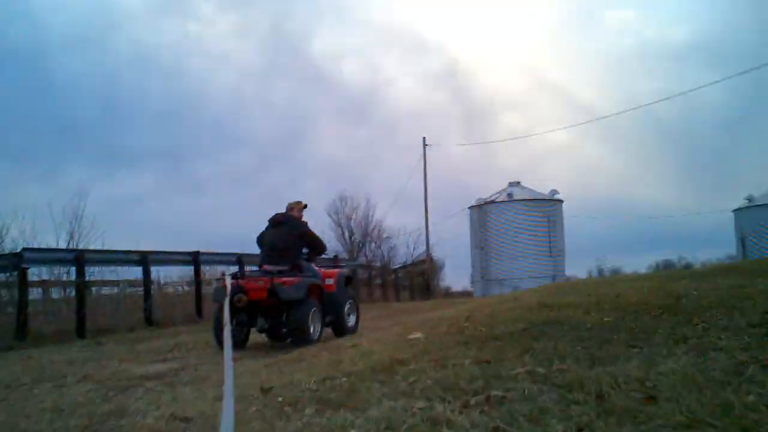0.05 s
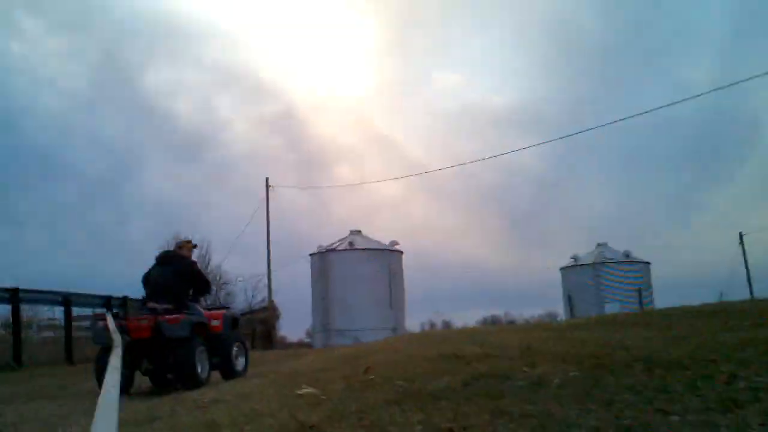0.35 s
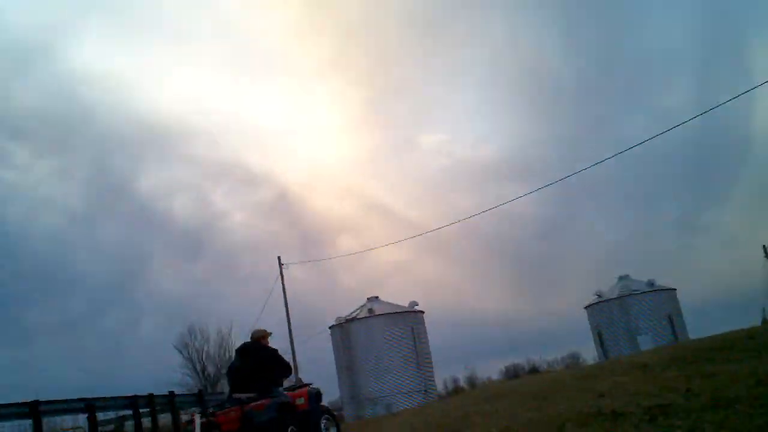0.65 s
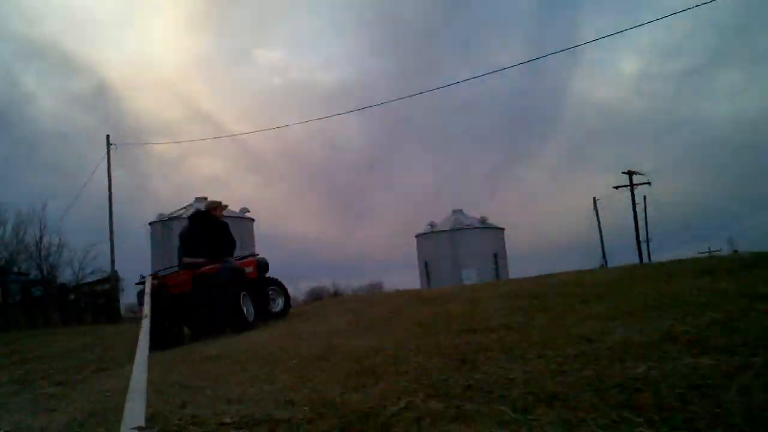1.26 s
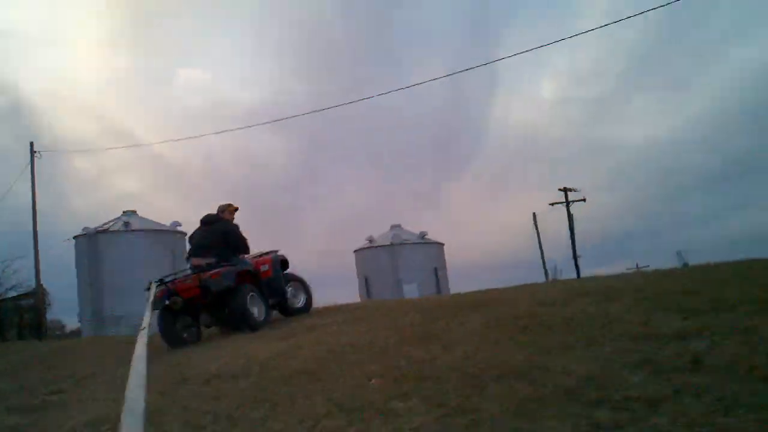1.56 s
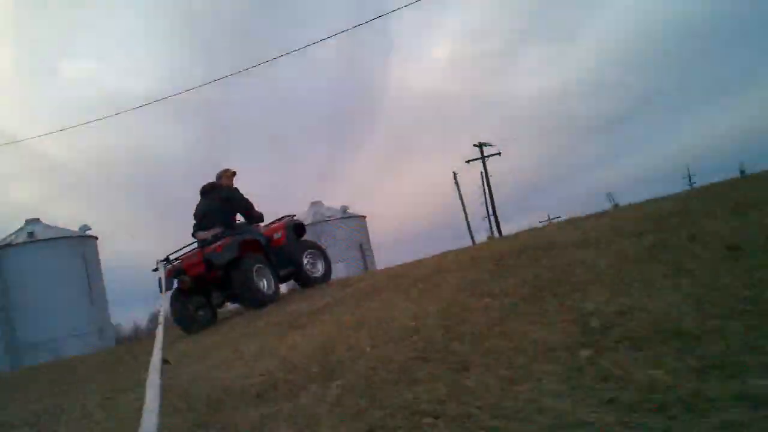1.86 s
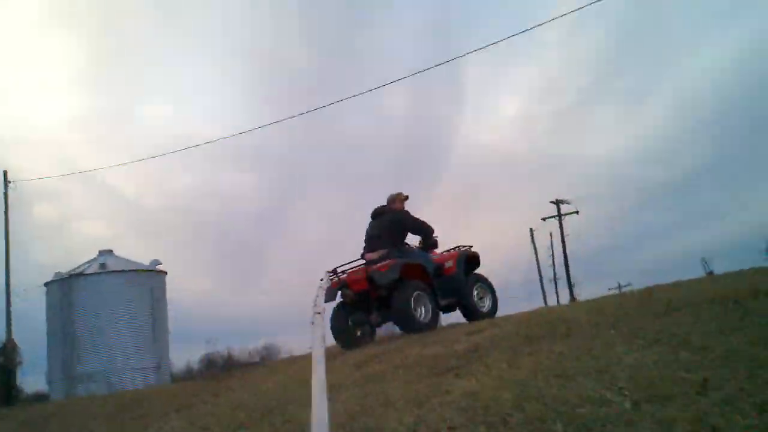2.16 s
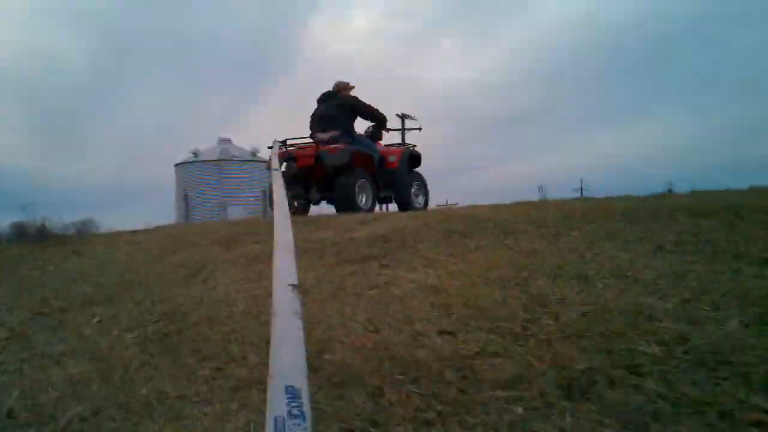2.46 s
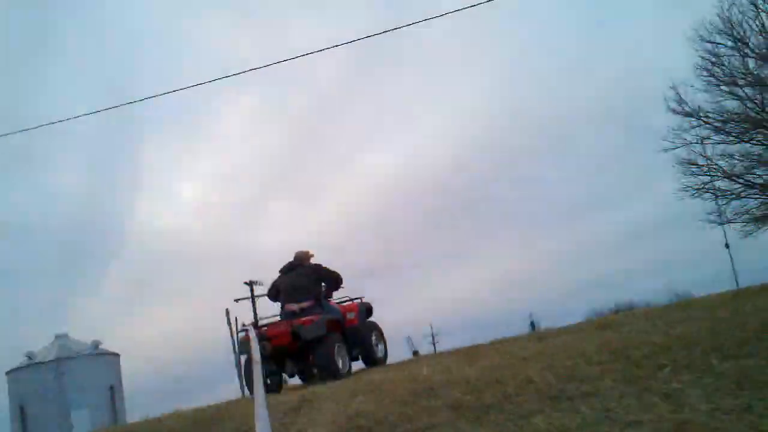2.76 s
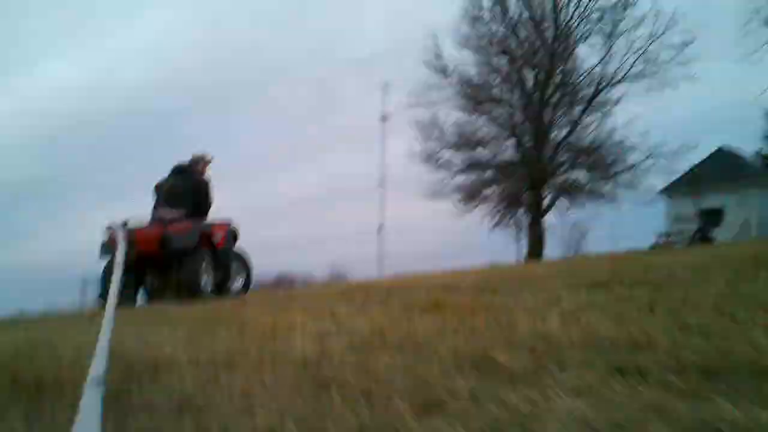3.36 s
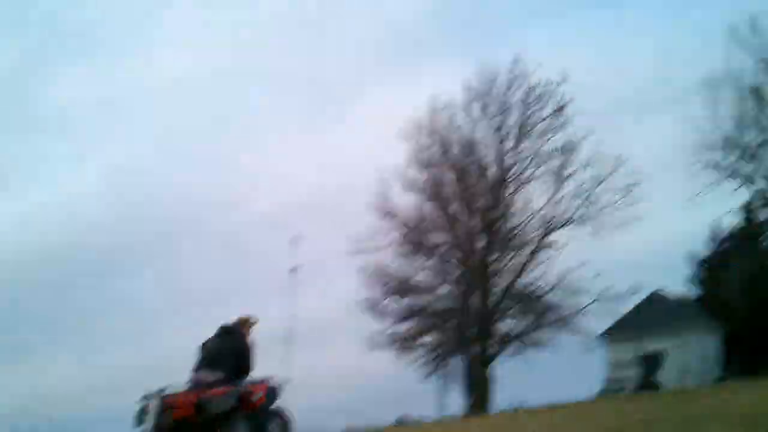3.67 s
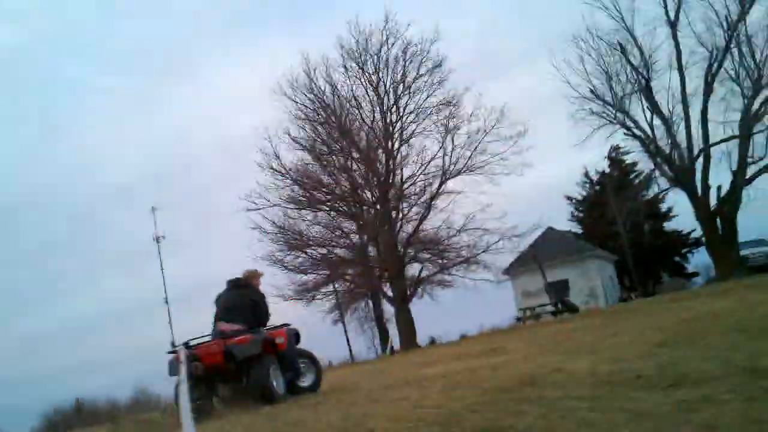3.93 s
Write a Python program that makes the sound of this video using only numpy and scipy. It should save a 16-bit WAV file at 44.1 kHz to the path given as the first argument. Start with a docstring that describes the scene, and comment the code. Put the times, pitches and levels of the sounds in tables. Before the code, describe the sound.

Plastic sled thudding and rattling across hissing grass behind a quad bike, with some wind.

```python
"""Sled ride behind a quad bike

On board a plastic sled towed over rough grass, two closely spaced microphone ports, stereo widened.
Wind brushes the ports and the single-cylinder engine putters up ahead. Right underneath, grass hisses
and the hull rumbles, thudding on soft humps, knocking and rattling on hard ones."""
import sys
import numpy as np
from scipy import signal
from scipy.fft import rfft, irfft
from scipy.io import wavfile
from scipy.ndimage import uniform_filter1d, minimum_filter1d

SR = 44100
rng = np.random.default_rng(int(sys.argv[2]) if len(sys.argv) > 2 else 0)


def generate_wav(signal):
    """Clip the signal to [-1, 1] and save it as 16-bit WAV at the path in sys.argv[1]."""
    frames = np.transpose(np.atleast_2d(signal))
    scaled = np.clip(frames, -1, 1) * 32767
    pcm = np.round(scaled).astype(np.int16)
    wavfile.write(sys.argv[1], SR, pcm)


N = 176400

# Levels are relative within each table.
# wind on the ports: frequency_hz, level_db
WIND_SPECTRUM = [(20, -11), (40, -5), (70, 3), (120, 4), (250, -1), (600, -8.5), (3000, -31)]
# engine firing rate: time_s, rate_hz
FIRING_RATE = [(0, 26.22), (.45, 27.83), (.7, 31.01), (1.05, 30.81), (1.6, 27.9), (2.4, 28.93), (3.2, 32.7),
               (4, 33.73)]
# exhaust resonances: pitch_hz, t60_s, level_db
EXHAUST_MODES = [(111.6, 0.45, 6.5), (161.8, 0.074, 3), (368, 0.018, -12.5)]
# grass hiss under the sled: time_s, level_db
HISS_LEVEL = [(0.0, -38.5), (0.02, -40.5), (.1, -39.5), (0.23, -37), (0.31, -41.5), (.36, -37),
              (0.43, -40.5), (0.49, -36.5), (0.55, -37.5), (0.6, -29), (0.61, -44), (0.78, -49),
              (1.06, -42), (1.15, -46), (1.17, -35.5), (1.18, -38.5), (1.36, -41), (1.57, -39),
              (1.59, -32.5), (1.65, -38.5), (1.9, -40.5), (1.96, -33), (1.98, -38.5), (2.22, -39),
              (2.33, -33.5), (2.345, -32), (2.38, -45.5), (2.43, -32), (2.47, -36), (2.65, -33.5),
              (2.77, -41), (2.95, -36.5), (3.31, -43.5), (3.41, -40), (3.53, -45.5), (3.73, -37),
              (3.8, -45), (4.0, -43.5)]
# colour of that hiss: frequency_hz, level_db
HISS_SPECTRUM = [(500, -4), (1500, 5), (1950, -4), (2400, 3.5), (3000, 1.5), (3600, -2), (5100, -6.5),
                 (6500, 1.5), (8300, 2.5), (10000, -0.5), (12000, -0.5), (14000, -4.5)]
# tufts scuffing the hull: start_s, level_db, decay_s
TUFT_SCUFFS = [(.574, -29.5, .03), (1.161, -28.5, 0.04), (1.25, -34, 0.066), (1.935, -41, 0.031),
               (2.44, -32, 0.24)]
# patches of crisp dry grass: peak_s, level_db, half_length_s, centre_hz
DRY_SWISHES = [(0.233, -32.5, 0.044, 8800), (0.488, -31.5, 0.032, 9200), (0.592, -30, 0.01, 8100),
               (2.435, -34, 0.014, 8500), (2.633, -41.5, 0.053, 8900)]
# dry stalks snapping: start_s, level_db, centre_hz
STALK_SNAPS = [(.245, -23, 9200), (0.526, -24, 3600), (.563, -40, 3700), (1.161, -27, 5330),
               (1.592, -28, 6440), (2.335, -20, 6290), (2.34, -31, 6940)]
# resonances of the plastic hull: pitch_hz, t60_s, level_db
HULL_MODES = [(153, 0.093, -3.5), (204.5, 0.024, 11), (266, 0.031, 2), (341.8, 0.05, 6.5),
              (422, 0.022, 2.5), (525.6, 0.04, -0.5), (643, 0.017, 2), (810, 0.0063, -3),
              (928, 0.055, -5.5), (1191, 0.024, -4), (1290, 0.01, -30), (1510, 0.073, -12.5),
              (1650, 0.075, -53.5)]
# rumble from the roughness of the ground: time_s, level_db
ROUGHNESS = [(0, -24), (.18, -27.5), (.28, -28.5), (.42, -24.5), (.65, -19), (.82, -26.5), (1.2, -26),
             (1.7, -25), (1.88, -26), (2.0, -36.5), (2.1, -25), (2.32, -23.5), (2.4, -35.5), (2.56, -23.5),
             (2.8, -22.5), (3.2, -20.5), (3.33, -24.5), (3.6, -22.5), (3.82, -29.5), (4, -24.5)]
# soft humps booming the floor pan: start_s, level_db, pan_hz, t60_s, sideways_ratio
SOFT_HUMPS = [(0.048, -33, 240, .03, .4), (0.105, -21, 294, 0.093, .3), (0.159, -19.5, 258, 0.077, .3),
              (.185, -18, 310, 0.11, 0.49), (0.345, -18.5, 250, 0.056, 0.55), (0.352, -27, 284, 0.017, .9),
              (0.406, -19.5, 330, .02, 1.8), (0.434, -13, 300, 0.015, .3), (.602, -10, 212, 0.056, 0.27),
              (.654, -18, 250, 0.018, .4), (.707, -8.5, 308, 0.017, 0.28), (1.075, -11, 357, 0.018, 0.56),
              (1.295, -17, 290, 0.01, 1.3), (1.304, -18.5, 230, .03, 2.2), (1.542, -13.5, 370, 0.0094, 1.5),
              (1.584, -16, 295, 0.017, 0.48), (1.731, -16, 340, 0.015, 1.4), (1.763, -21, 298, 0.011, 2.3),
              (1.778, -14, 314, 0.019, .3), (1.893, -25, 247, 0.054, 2.6),
              (2.046, -18.5, 218.6, 0.028, 0.36), (2.176, -16, 294.7, .05, .3),
              (2.285, -21.5, 294, .04, 0.89), (2.757, -18.5, 259, .03, 0.7), (2.838, -25, 332, 0.012, 1.4),
              (2.9003, -12, 340, 0.012, 0.35), (3.086, -8, 288, 0.011, .5), (3.115, -11, 307, 0.015, .6),
              (3.169, -19.5, 372, 0.036, .4), (3.197, -11, 360, 0.031, .3), (3.232, -9, 262, 0.031, 0.27),
              (3.418, -6.5, 342, 0.075, .3), (3.455, -13, 296, 0.021, 0.5), (3.481, -12.5, 272, 0.01, 0.37),
              (3.509, -17, 340, 0.074, 0.44), (3.686, -10, 288, 0.016, 1.1), (3.925, -22, 303, 0.015, .8)]
# hard bumps: start_s, blow_db, slap_db, rattle_db, rattle_decay_s, crack_db, panel_hz
HARD_BUMPS = [(0.599, 4, -8.5, -28, 0.032, -39, 1770), (0.645, -17, -27, -34, 0.026, -60, 480),
              (1.489, -14, -23, -28.5, 0.015, -58, 1180), (1.517, -5, -20, -19, 0.022, -41, 1580),
              (1.582, -29, -29, -30, .014, -47, 696), (1.661, -5, -17, -21, 0.054, -29.5, 576),
              (1.6638, -5, -15, -23.5, 0.027, -37, 970), (1.682, -17, -20, -25, 0.019, -60, 565),
              (1.731, -25, -26, -30, 0.016, -60, 940), (1.779, -21, -31, -30.5, .028, -40, 580),
              (2.7573, -1, -12.5, -22.5, .047, -48, 790), (2.761, -5, -15, -27, 0.023, -50, 900),
              (2.9013, -6.5, -16, -19.5, 0.035, -33.5, 496), (3.076, -14, -34, -31, 0.063, -55, 1030),
              (3.116, -24, -39, -27, 0.036, -45, 610), (3.1398, -14, -21, -24, 0.041, -38.5, 1370),
              (3.197, -15, -38, -34, 0.054, -49, 564), (3.236, -26, -42, -32, 0.052, -53, 810),
              (3.378, -22, -47, -30.5, 0.07, -39, 1560), (3.417, -3, -14, -21.5, 0.05, -23.5, 1190),
              (3.4204, -3, -22, -29, .015, -33.5, 1150), (3.648, -31, -32, -31, .06, -44, 1310),
              (3.6835, -16, -17, -26, 0.051, -34, 1400), (3.687, -23, -17, -20, 0.041, -24, 1320)]
# resonances of the cracking plastic: pitch_hz, t60_s, level_db
CRACK_MODES = [(2340, 0.019, 17), (2680, 0.0033, -1), (3040, 0.002, -2), (3540, 0.018, -19.5)]
# how much the two ports differ: frequency_hz, difference_db
PORT_DIFFERENCE = [(60, -3.5), (130, -11), (300, -6), (620, -4), (1400, -0.5), (2000, 0), (2550, 9),
                   (3200, -3.5), (6000, -.5)]
# cross-feed of the stereo widener: frequency_hz, into_left_db, into_right_db
CROSS_FEED = [(60, -.5, -.5), (2600, -.3, -.3), (4000, -1, -1), (5200, -5, -3), (6500, -24, -9),
              (14000, -30, -9)]

TIME_S = np.arange(N) / SR
LEFT_RIGHT = np.array([[1], [-1]])


def undb(db):
    """Decibels to gain."""
    return 10 ** (np.asarray(db) / 20)


def unit(x):
    """Scale to rms 1."""
    return x / np.sqrt(np.mean(x ** 2))


def curve(rows):
    """A control, joined by straight lines in time."""
    return np.interp(TIME_S, *np.array(rows).T)


def over_hz(hz, rows, column=1):
    """One column of a table, joined on a log-frequency axis."""
    rows = np.array(rows)
    return np.interp(np.log(hz + 1), np.log(rows[:, 0]), rows[:, column])


def colour(x, rows):
    """Give noise a spectrum, at rms 1."""
    gain = undb(over_hz(np.fft.rfftfreq(N, 1 / SR), rows))
    return unit(irfft(rfft(x) * gain, N))


def cut(x, hz, kind, order=2):
    """Low-pass or high-pass."""
    return signal.sosfilt(signal.butter(order, hz, kind, fs=SR, output="sos"), x)


def band(x, hz, width_hz):
    """One resonance, gain 1 at its centre."""
    return signal.lfilter(*signal.iirpeak(hz, hz / width_hz, fs=SR), x)


def ring(force, modes, stretch=1):
    """A body's modes, driven by a force; stretch scales their pitch."""
    return sum(undb(db) * band(force + 1e-18, hz * stretch, np.log(1000) / np.pi / t60)
               for hz, t60, db in modes)


def grains(per_s, spread_db, count=N):
    """Random tiny contacts of unequal size, at each port."""
    size = undb(spread_db * np.minimum(rng.exponential(size=(2, count)), 5))
    return unit(rng.standard_normal((2, count)) * size * (rng.random((2, count)) < per_s / SR))


def drift(rate_hz):
    """Smooth random wander, at rms 1."""
    hold = int(SR / rate_hz)
    steps = np.repeat(rng.standard_normal(N // hold + 1), hold)
    return unit(uniform_filter1d(steps, hold)[:N])


def fades(rows):
    """Envelope of bursts that start abruptly and die away; overlaps add in power."""
    power = np.zeros(N)
    for start_s, db, decay_s in rows:
        i = int(start_s * SR)
        power[i:] += undb(2 * db) * np.exp(-np.minimum(2 * TIME_S[:N - i] / decay_s, 100))
    return np.sqrt(power)


def wind(level_db=-35.5, gust_db=2):
    """Low, gusty buffeting right on the microphone, unrelated at the two ports."""
    return colour(rng.standard_normal((2, N)), WIND_SPECTRUM) * undb(level_db + gust_db * drift(5.6))


def engine(exhaust_db=-40, tick_db=-47.5, scatter_db=3.5, tick_decay_cycles=.1):
    """Up ahead, each firing rings the exhaust and brings a short mechanical tick."""
    cycles = np.cumsum(curve(FIRING_RATE) * (1 + 0.00733 * drift(15))) / SR
    firing = cycles.astype(int)
    strength = undb(scatter_db * rng.standard_normal(N // 100))[firing]
    pulses = np.diff(firing, prepend=0) * strength
    exhaust = unit(cut(ring(pulses, EXHAUST_MODES), 660, "low"))
    clatter = rng.standard_normal((2, N)) * strength * np.exp(-(cycles % 1) / tick_decay_cycles)
    tick = unit(band(clatter, 2760, width_hz=1500))
    return undb(exhaust_db) * exhaust + undb(tick_db) * cut(tick, 3460, "low")


def grass(hiss_gain_db=4.5, flicker_db=2, split_hz=9400, snap_decay_s=.0035):
    """Close below, coarse and fine blades brush the hull, tufts scuff, dry patches swish, stalks snap."""
    blades = sum(cut(grains(18000, 1.6), split_hz, kind, order=4) * undb(flicker_db * drift(70))
                 for kind in ("low", "high"))
    hiss = colour(blades, HISS_SPECTRUM) * undb(curve(HISS_LEVEL) + hiss_gain_db)
    scuffs = unit(band(grains(4600, 2.6), 1690, width_hz=1300)) * fades(TUFT_SCUFFS)
    stalks = grains(5000, 3)
    swishes = sum(unit(band(stalks, hz, width_hz=1700)) * undb(db) * np.exp(-((TIME_S - s) / half) ** 2)
                  for s, db, half, hz in DRY_SWISHES)
    fibres = grains(12000, 2.6)
    snaps = sum(unit(band(fibres, hz, width_hz=3500)) * fades([(s, db, snap_decay_s)])
                for s, db, hz in STALK_SNAPS)
    return hiss + scuffs + swishes + snaps


def soft_hull(force, top_hz):
    """A soft contact reaches only the hull's low modes."""
    return ring(cut(force, top_hz, "low", order=5), HULL_MODES)


def hard_hull(force, stretch=1):
    """A hard contact rings the whole shell."""
    contact = cut(cut(force, 1777, "low", order=7), 185, "high", order=1)
    return ring(contact, HULL_MODES, stretch)


def sliding(scrape_db=-18.5):
    """Small clods drum on the hull and grit scrapes it, more on rough ground."""
    clods = grains(per_s=900, spread_db=1.77)
    rumble = unit(soft_hull(clods, top_hz=444))
    grit = grains(per_s=2200, spread_db=3)
    scrape = unit(cut(hard_hull(grit), 470, "high"))
    return undb(curve(ROUGHNESS)) * (rumble + undb(scrape_db) * scrape)


def thud(pan_hz, t60_s, sideways, pan_db=14, shudder_db=-18, shudder_decay_s=.045):
    """A soft hump rocks the hull; the floor pan booms and shudders, pitched by where it is pressed."""
    def body(force):
        shell = soft_hull(force, top_hz=510)
        return shell + ring(shell, [(pan_hz, t60_s, pan_db)])
    t = TIME_S[:SR // 4]
    boom = body(signal.unit_impulse(len(t)))
    lean = 1 + rng.choice([-1, 1]) * sideways * LEFT_RIGHT
    shudder = body(rng.standard_normal((2, len(t))) * np.exp(-t / shudder_decay_s))
    return lean * boom / np.abs(boom).max() + undb(shudder_db) * shudder / np.linalg.norm(boom)


def thuds(gain_db=3.5):
    """The soft humps pass under the microphone, one thud each."""
    out = np.zeros((2, N + SR))
    for start_s, db, pan_hz, t60_s, sideways in SOFT_HUMPS:
        i = int(start_s * SR)
        out[:, i:i + SR // 4] += undb(db + gain_db) * thud(pan_hz, t60_s, sideways)
    return out[:, :N]


def cracks(gain_db=3.5, decay_s=.033, burst_gain_db=3, burst_decay_s=.005):
    """The plastic cracks on the sharpest bumps, each crack opening with a brief, brighter burst."""
    crack = unit(ring(cut(grains(8800, 1.17), 3300, "low"), CRACK_MODES))
    crack *= fades([(s, db + gain_db, decay_s) for s, *_, db, _ in HARD_BUMPS])
    burst = unit(cut(band(grains(20000, 0.83), 2850, width_hz=1200), 4300, "low", order=1))
    burst *= fades([(s, db + burst_gain_db, burst_decay_s) for s, *_, db, _ in HARD_BUMPS])
    return crack + burst


def knock(blow_db, slap_db, rattle_db, rattle_decay_s, panel_hz, blow_gain_db=-4.5, rattle_gain_db=5):
    """A blow on hard ground, a slap and a dying rattle; the struck panel rings most."""
    stretch = 1 + .02 * rng.standard_normal()  # the shell flexes, shifting its modes from blow to blow
    def body(force):
        shell = hard_hull(force, stretch)
        return shell + band(shell, panel_hz, width_hz=64)
    t = TIME_S[:SR // 2]
    blow = body(signal.unit_impulse(len(t)))
    lean = 1 + rng.choice([-1, 1]) * .45 * LEFT_RIGHT
    slap = undb(slap_db) * np.exp(-t / .004)  # the rest of the underside lands
    rattle = undb(rattle_db + rattle_gain_db) * np.exp(-t / rattle_decay_s)
    shake = body(grains(5000, 1.6, count=len(t)) * (slap + rattle)) / np.linalg.norm(blow)
    return undb(blow_db + blow_gain_db) * lean * blow / np.abs(blow).max() + shake


def knocks():
    """The hard bumps strike the hull right by the microphone, one knock each."""
    out = np.zeros((2, N + SR))
    for start_s, blow_db, slap_db, rattle_db, decay_s, _, panel_hz in HARD_BUMPS:
        i = int(start_s * SR)
        out[:, i:i + SR // 2] += knock(blow_db, slap_db, rattle_db, decay_s, panel_hz)
    return out[:, :N]


def limit(x, ceiling=.97, window_s=.003):
    """The recorder's gain dips around peaks that would overload."""
    size = int(window_s * SR)
    gain = np.minimum(1, ceiling / (np.abs(x).max(axis=0) + 1e-9))
    return x * uniform_filter1d(minimum_filter1d(gain, size), size)


def scene(low_cut_hz=108):
    """From on board: hull and grass close below, engine ahead, wind on the two ports."""
    hull = knocks() + cracks() + thuds() + sliding()
    return cut(hull + engine(), low_cut_hz, "high", order=3) + grass() + wind()


def record(dry, cross_lag_s=.000383, top_hz=14050):
    """The close ports share their bass; the recorder widens the stereo, limits peaks and cuts the top."""
    hz = np.fft.rfftfreq(N, 1 / SR)
    # each channel has a delayed copy of the other taken away
    feed = undb([over_hz(hz, CROSS_FEED, column=1), over_hz(hz, CROSS_FEED, column=2)])
    cross = feed * np.exp(-2j * np.pi * hz * cross_lag_s)
    mid_gain = 1 - cross
    side_gain = (1 + cross) * undb(over_hz(hz, PORT_DIFFERENCE)) * LEFT_RIGHT
    total_gain = np.sqrt(2 * (abs(mid_gain) ** 2 + abs(side_gain) ** 2))
    mid, side = rfft(dry[0] + dry[1]), rfft(dry[0] - dry[1])
    wide = irfft((mid * mid_gain + side * side_gain) / total_gain, N)
    return signal.sosfilt(signal.ellip(12, .2, 80, top_hz, fs=SR, output="sos"), limit(wide))


dry = scene()
out = record(dry)
generate_wav(out)
```